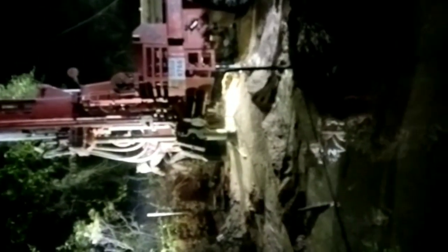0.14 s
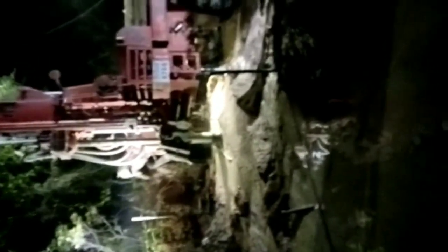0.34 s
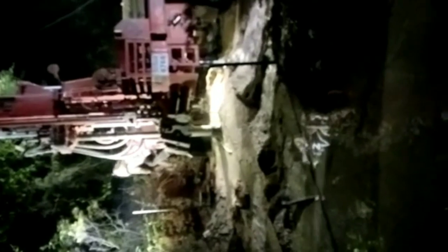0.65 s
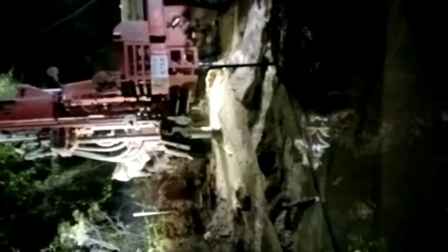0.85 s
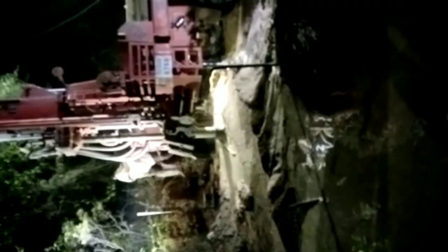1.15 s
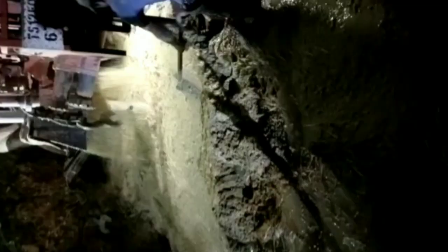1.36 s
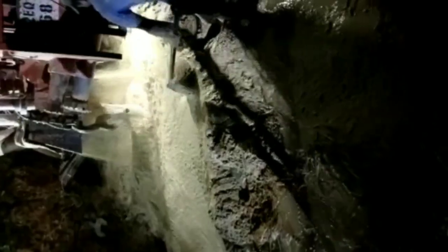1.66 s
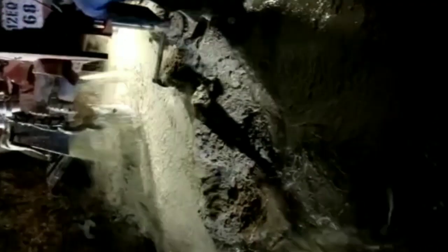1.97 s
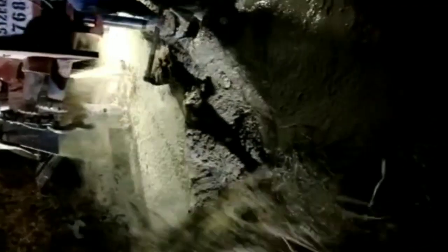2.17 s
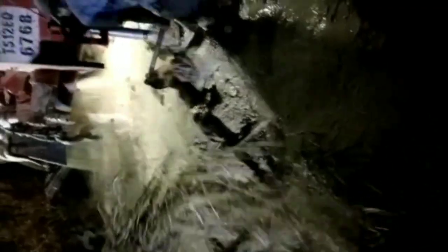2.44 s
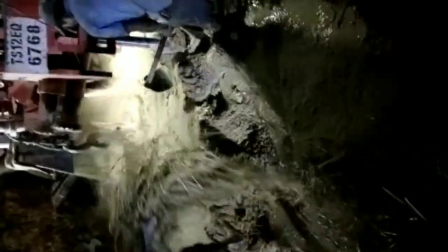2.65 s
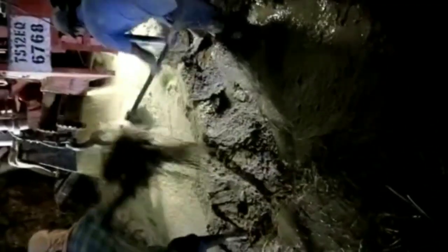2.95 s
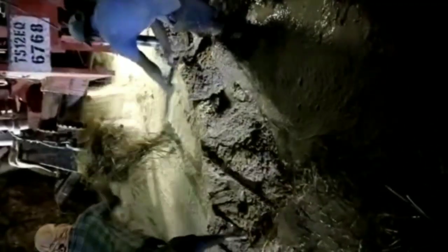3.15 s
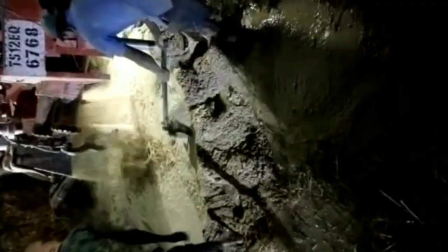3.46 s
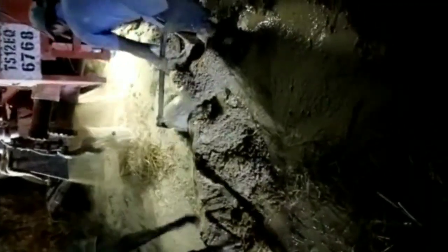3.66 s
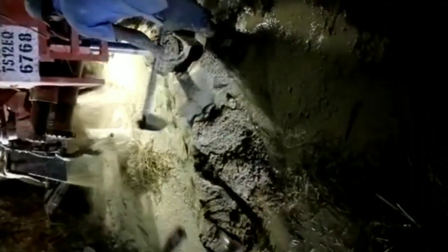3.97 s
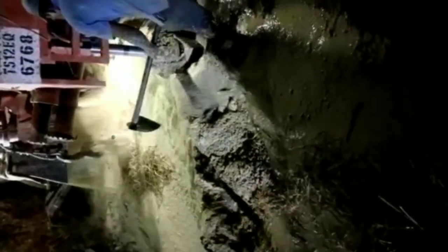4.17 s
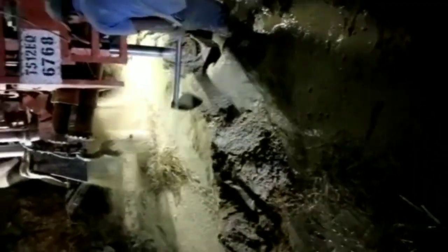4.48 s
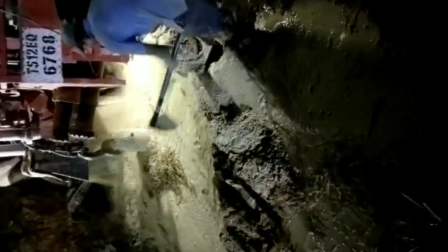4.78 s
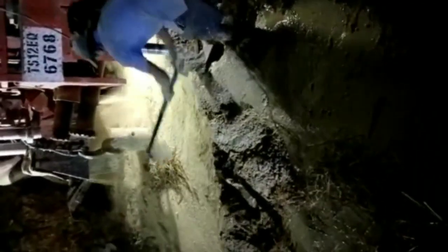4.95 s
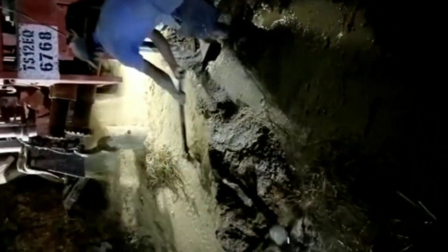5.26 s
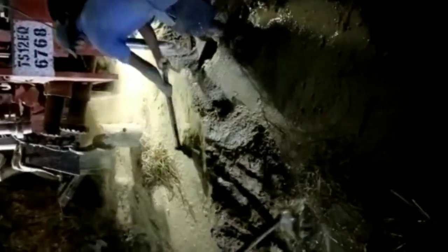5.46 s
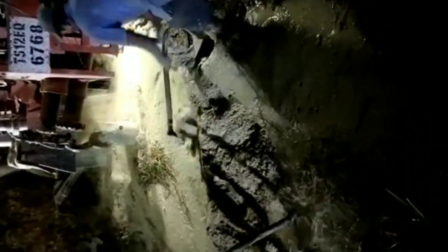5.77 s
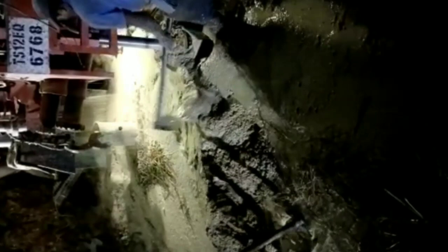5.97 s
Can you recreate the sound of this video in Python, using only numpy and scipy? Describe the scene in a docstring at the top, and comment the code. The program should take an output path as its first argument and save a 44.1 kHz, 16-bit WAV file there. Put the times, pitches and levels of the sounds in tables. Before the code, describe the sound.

Two joined views of a loud rig in the open. First, from a distance, strong bassy engine pulses with rough machinery noise and thin air hiss. A hard cut and short silence follow. Then, with the microphone beside the hole, a faster diesel drones under broad blowing air and bright spray, with loose chinking, small gritty scrapes, sharp metal-on-stone clinks and one throbbing hum that sags in pitch.

```python
"""A drilling site with a truck-mounted rig, heard from two spots with a short silence between them.
Afar, a slow diesel thumps: a harmonic series of firing orders over amplitude-modulated coloured noise.
Beside the hole a faster diesel drones, its silencer booming as tones and narrow-band noise, while
filtered noise of varying level is compressed air blowing slurry out of the bore. Loose debris rattles,
and a hoe clinks and scrapes on stones: damped modes set off by blows and by dense random clicks."""
import sys
import numpy as np
from scipy import signal
from scipy.fft import rfft, irfft
from scipy.io import wavfile

SR = 44100
rng = np.random.default_rng(int(sys.argv[2]) if len(sys.argv) > 2 else 0)


def waveform_to_disk(signal):
    """Save audio, clipped to [-1, 1], as 16-bit WAV at the path in sys.argv[1]."""
    frames = np.transpose(np.atleast_2d(signal))
    scaled = np.clip(frames, -1, 1) * 32767
    samples = np.round(scaled).astype(np.int16)
    wavfile.write(sys.argv[1], SR, samples)


N = 269892
TIME_S = np.arange(N) / SR

FAR_END_S, NEAR_START_S = 1.3165, 1.519
FAR_FIRING_HZ, NEAR_FIRING_HZ = 60.93, 95.35   # mean firing rates
FAR_LAG, NEAR_LAG = 10, -11   # delay of the left channel behind the right [samples]

# All levels hold ahead of the fade-in and the final limiter.
# Exhaust orders of six unequal cylinders: multiple of the firing rate [1], level/dB [rms, relative]
FAR_EXHAUST_ORDERS = [(.5, -27.5), (.667, -35), (1, 2), (1.33, -25), (1.5, -27), (1.67, -23), (2, -8.5),
                      (2.17, -22.5), (2.5, -25), (3.17, -31), (4.5, -40), (4.83, -31.5), (5, -31),
                      (5.83, -33), (6, -34), (6.33, -31.5), (7.33, -32.5)]
NEAR_EXHAUST_ORDERS = [(.5, -26), (.667, -28), (1, 0.5), (1.17, -29), (1.33, -27), (1.5, -19),
                       (1.67, -22.5), (1.83, -25), (2, -22.5), (2.67, -24), (3, -20.5), (3.83, -25.5),
                       (6, -39), (7.5, -30.5), (7.83, -31), (8, -24), (8.17, -28.5), (8.33, -29),
                       (8.67, -33), (10, -28.5)]
# Steady tones of pumps and fans: f/Hz, level/dB [rms]
PUMP_TONES = [(58.7, -32.5), (332, -31), (393, -31.5), (815, -41.5)]
# Noise spectra, silent outside their end points: f/Hz, level/dB [relative, per Hz]
FAR_MACHINERY_SPECTRUM = [(22, -10.5), (45, -6.5), (85, -9.5), (130, -6), (175, -10), (260, -7),
                          (310, -2.5), (450, -8), (540, -13), (660, -14.5), (780, -7), (1050, -16),
                          (1500, -15), (1700, -19.5), (2600, -23.5)]
FAR_AIR_SPECTRUM = [(2200, -29), (2950, -15.5), (3200, -6), (3660, -5), (4500, -12.5), (5200, -19.5),
                    (5850, -21), (8300, -22), (9100, -12.5), (9800, -23), (10700, -29.5), (16000, -33)]
NEAR_MACHINERY_SPECTRUM = [(22, -15), (60, -4.5), (150, -1), (195, 1), (225, -5), (330, -4), (400, -2),
                           (440, -11.5), (620, -13), (760, -8), (825, -5), (880, -14.5), (1100, -14),
                           (1350, -14.5), (1600, -22), (2000, -30)]
BOOM_SPECTRUM = [(300, -20), (350, -1), (380, -1.5), (400, 5.5), (430, -29)]
AIR_SPECTRUM = [(1000, -13), (1330, -9), (1600, -2), (2200, -2.5), (2900, -3), (3130, -0.5), (3950, -5),
                (4370, -5), (4870, -6.5), (5800, -12.5)]
SPRAY_SPECTRUM = [(5300, -1.5), (6330, 1), (7150, 1.5), (8540, 3), (9610, 3), (10200, -2.5), (13000, -6),
                  (14900, 0), (16000, -20)]
# Resonances of panels and pipes in the noise: f/Hz, width/Hz, boost/dB
FAR_PANEL_MODES = [(383, 9.4, 5), (454, 9.5, 4.5), (1152, 29, 9), (1520, 23, 9), (1836, 81, 5),
                   (2797, 180, 12), (3180, 110, 5.5), (3610, 220, 4.5), (3870, 40, 4.5), (4290, 70, 4),
                   (5070, 280, 8)]
NEAR_PANEL_MODES = [(1200, 79, 2.7), (1900, 57, 1.8), (2730, 18, 7.6), (3080, 19, 4.1), (4300, 77, 3.4),
                    (4500, 42, 3.5), (6920, 48, 9.6), (9240, 230, 1.5)]
# Stereo coherence: f/Hz, share of power common to both channels [1, clipped to 0 ... 0.995]
FAR_COHERENCE = [(60, 1), (130, 0.5), (290, 0.8), (640, 1.3), (1400, -0.3), (3100, 0.68), (6800, 0.27),
                 (15000, -0.1)]
NEAR_COHERENCE = [(60, 0.8), (130, 0.99), (290, 0.87), (640, 0.091), (1400, 0.08), (3100, 0.17),
                  (6800, 0.16), (15000, 0.3)]
# Stereo balance of the noise: f/Hz, left minus right level/dB
STEREO_BALANCE = [(1000, 0), (2400, 1.5), (4400, 2), (8100, 3), (10500, 4), (15000, .5)]
# Air blowing out of the bore: t/s, air level/dB [rms], spray level/dB [rms]
BLOW_LEVELS = [(1.5, -23.5, -26.5), (1.9, -26, -28.5), (2.1, -26.5, -29), (2.7, -26.5, -30),
               (3.0, -25.5, -28), (3.75, -26, -28.5), (3.83, -24.5, -31.5), (3.87, -25, -24),
               (3.91, -25.5, -30.5), (4.28, -26.5, -29), (4.4, -28, -33.5), (4.6, -27, -29),
               (4.9, -28, -34), (5.1, -28, -33), (5.26, -30, -34.5), (5.29, -26, -26), (5.34, -28.5, -36),
               (5.5, -30, -33.5), (5.78, -30, -35.5), (6.12, -28.5, -33)]
# Silencer boom: t/s, level/dB [rms]
BOOM_LEVELS = [(1.5, -27), (1.8, -26), (2.2, -32), (3.1, -30), (4.9, -32.5), (5.2, -34), (5.6, -30),
               (5.8, -33), (6.12, -29)]
# Hum at twice the firing rate: t/s, level/dB [rms]
SECOND_ORDER_LEVELS = [(1.5, -31.5), (2.5, -38), (2.75, -27), (3.2, -34), (3.45, -27.5), (3.8, -28),
                       (4.1, -34.5), (4.9, -41), (5.05, -21), (5.45, -35), (5.7, -33), (6.12, -38)]
# Low thump near the start of the near spot: t/s, f/Hz, peak level/dB, T60/s
LOW_THUMP = (1.744, 38, -11, .1)
# Modes of the hoe: f/Hz, level/dB [relative], free T60/s
BLADE_MODES = [(710, -6, .07), (800, -4, .12), (1150, -3, .08), (1310, 0, .11), (1450, -4, .1),
               (1740, -1, .08), (1960, -2, .09), (2540, -2, .2), (3125, 0, .12), (3290, -7, .1),
               (3750, -5, .07), (3900, 0, .07), (4270, -2, .09), (4550, -4, .12), (5300, 0, .08)]
# Blows on stones; the point struck favours one pitch, mud on the blade alters the ring:
# t/s, peak level/dB [ahead of the mode levels], favoured f/Hz, fraction of the free T60 [1]
STONE_BLOWS = [(1.91, -20, 1960, .9), (1.928, -15, 2540, .7), (1.93, -17, 3290, .9), (1.945, -17, 4600, 1.),
               (1.965, -16, 4570, .5), (1.975, -17, 3750, .4), (2.158, -17, 4270, .7),
               (2.178, -16, 1310, 1.3), (2.21, -17, 2540, .3), (2.235, -11, 3290, .7),
               (2.25, -18, 4270, .6), (2.27, -17, 4270, .6), (2.295, -14, 3290, .5), (2.352, -16, 4100, .5),
               (2.392, -8, 4270, .4), (2.40, -17, 1310, .6), (3.296, -3, 4000, .3), (3.297, -13, 5300, .3),
               (3.425, -16, 3200, .3), (3.562, -16, 4270, .9), (3.578, -18, 4500, .5),
               (3.58, -18, 1350, .7), (3.682, -16, 4230, .9), (3.756, -17, 1960, .8),
               (4.898, -11, 3900, .5), (4.903, -14, 3600, .5), (4.836, -15, 1240, .8),
               (4.901, -4, 1220, .7), (4.906, -11, 1740, .8), (4.912, -8, 760, .9), (4.92, -13, 3125, .9),
               (4.935, -16, 2540, .3), (4.945, -13, 3125, .8), (4.965, -16, 1300, .6),
               (4.983, -14, 2600, .4), (4.983, -16, 3125, .7), (4.9958, -17, 3125, .9)]
# Blade dragged over grit: t/s, length/s, peak level/dB [of the rms], favoured f/Hz
GRIT_DRAGS = [(1.772, 0.05, -28, 1900), (1.892, 0.11, -24, 2600), (2.16, 0.075, -25.5, 2600),
              (2.284, 0.041, -30, 3200), (2.345, 0.06, -29, 4000), (3.29, 0.027, -30, 4500),
              (3.45, 0.06, -31, 3500), (4.775, 0.06, -25, 3300), (4.825, 0.05, -25, 1800),
              (4.895, 0.05, -20.5, 1500), (4.925, 0.08, -24.5, 1500)]


def from_db(db):
    """Definition of level: amplitude ratio = 10^(dB/20)."""
    return 10 ** (np.asarray(db) / 20)


def rms_one(x):
    """Normalisation to unit mean power."""
    return x / np.sqrt(np.mean(x ** 2) + 1e-20)


def in_time(rows):
    """Linear interpolation of each table column to one value a sample."""
    s, *columns = np.transpose(rows)
    return [np.interp(TIME_S, s, column) for column in columns]


def at_hz(points, hz):
    """Interpolation of a spectrum on a logarithmic frequency axis."""
    table_hz, values = np.transpose(points)
    return np.interp(np.log(hz), np.log(table_hz), values)


def drift(rate):
    """Low-pass random process: white noise on a coarse grid through two equal poles at rate [Hz]."""
    step = 40   # samples
    r = np.exp(-2 * np.pi * rate * step / SR)
    white = rng.standard_normal(N // step + 2002)
    slow = signal.lfilter([1], [1, -2 * r, r * r], white)[2000:]   # without the settling time
    return np.interp(np.arange(N) / step, np.arange(len(slow)), rms_one(slow))


def both_channels(x, lag):
    """Interchannel delay: the left channel carries the same wave lag samples later."""
    return np.array([x[np.clip(np.arange(N) - lag, 0, N - 1)], x])


def fade_in(length_s):
    """Linear amplitude ramp from -15 dB to full level."""
    along = np.clip((TIME_S - NEAR_START_S) / length_s, 0, 1)
    return along + (1 - along) * from_db(-15)


def ring_out(clicks, hz, width):
    """Impulse response of a two-pole resonator: clicks ring at hz with bandwidth width [Hz]."""
    r = np.exp(-np.pi * width / SR)
    poles = [1, -2 * r * np.cos(2 * np.pi * hz / SR), r * r]
    return rms_one(signal.lfilter([1, 0, -1], poles, clicks + 1e-18))


def struck(s, hz, peak_db, t60, crack_db):
    """Modal impact: a soft contact starts decaying sinusoids and a short low-passed noise crack."""
    out, t = np.zeros(N), np.arange(SR // 4)[:, None] / SR
    rings = from_db(peak_db - 60 * t / t60) * np.sin(2 * np.pi * hz * t)
    low_pass = signal.butter(4, 5000, fs=SR, output="sos")
    crack = signal.sosfilt(low_pass, rng.standard_normal(len(t)))
    crack *= from_db(np.max(peak_db) + crack_db - 60 * t[:, 0] / 0.02)
    onset = 1 - np.exp(-t[:, 0] / 0.004)
    out[round(s * SR):][:len(t)] = onset * rings.sum(axis=1) + crack
    return out


def noise(spectrum, panels, likeness, lag, shared_db, own_db, rate, size):
    """Spectral shaping of partly coherent stereo noise; third-octave bands fluctuate; mid power 1."""
    hz = np.maximum(np.arange(size // 2 + 1) * SR / size, 1)
    alike = np.clip(at_hz(likeness, hz), 0, .995)
    common, *apart = rfft(rng.standard_normal((3, size)))
    half = np.array([[.5], [-.5]])   # left, right
    turn = np.exp(-2j * np.pi * half * hz * lag / SR)   # phase of the interchannel delay
    inside = (hz > spectrum[0][0]) & (hz < spectrum[-1][0])
    boost_db = sum(db / (1 + (2 * (hz - centre) / width) ** 2) for centre, width, db in panels)
    colour = from_db(at_hz(spectrum, hz) + boost_db + half * at_hz(STEREO_BALANCE, hz)) * inside
    whole = colour * (np.sqrt(alike) * common * turn + np.sqrt(1 - alike) * np.array(apart))
    place = np.log2(hz / spectrum[0][0]) * 3   # third octaves above the lower edge
    out, together = 0, drift(rate)[:size]
    for k in range(int(place[inside].max()) + 2):
        band = np.clip(1 - abs(place - k), 0, 1)   # overlapping bands that sum to one
        swing_db = shared_db * together + own_db * drift(rate)[:size]
        out = out + from_db(swing_db) * irfft(whole * band, size)
    return out / np.sqrt(np.mean(out.mean(axis=0) ** 2))


def diesel(firing_hz, orders, wander, unsteady_db):
    """Fourier synthesis of exhaust pulses from orders of a wandering firing rate; also the phase."""
    phase = np.pi + 2 * np.pi * np.cumsum(firing_hz * (1 + wander * drift(2.1))) / SR
    out = 0
    for k, db in orders:
        multiple = round(6 * k) / 6
        # whole orders align into one sharp suction pulse a firing; the rest come from unequal cylinders
        start = np.pi if multiple % 1 == 0 else rng.uniform(0, 2 * np.pi)
        swing = unsteady_db * np.clip(-db / 4, 1, 5) * drift(5.0)   # weak orders waver more
        out = out + from_db(db + swing) * np.cos(multiple * phase + start)
    return np.sqrt(2) * out, phase


def far_spot():
    """Amplitude modulation: each firing of the slow diesel modulates the machinery and air noise."""
    size = 60000
    exhaust, phase = diesel(FAR_FIRING_HZ, FAR_EXHAUST_ORDERS, wander=.001, unsteady_db=.3)
    picture = FAR_PANEL_MODES, FAR_COHERENCE, FAR_LAG
    machinery = noise(FAR_MACHINERY_SPECTRUM, *picture, shared_db=-1.5, own_db=1.5, rate=15.0, size=size)
    air = noise(FAR_AIR_SPECTRUM, *picture, shared_db=.7, own_db=1.6, rate=20., size=size)
    throb = 1 + 0.17 * np.cos(phase[:size]) + 0.16 * np.cos(phase[:size] / 2)
    hiss = throb * (from_db(-26) * machinery + from_db(-30.5) * air)
    return from_db(-9) * both_channels(exhaust, FAR_LAG) + np.pad(hiss, ((0, 0), (0, N - size)))


def rattle():
    """Sparse random excitation of many small resonators: loose metal and debris chink on both sides."""
    chinks_per_s = 130
    sizes = from_db(2.3 * np.minimum(rng.exponential(1, N), 4)) * (rng.random(N) < chinks_per_s / SR)
    dealt, out = rng.integers(0, 24, N), np.zeros((2, N))   # each chink goes to one resonance
    for k, hz in enumerate(np.geomspace(900, 5200, 24)):
        pan = from_db(rng.normal(0, 7) * np.array([[.5], [-.5]]))
        out += ring_out(sizes * (dealt == k), hz, width=40) * pan
    return rms_one(out)


def near_noise(boom_db):
    """Turbulence noise of air and spray from the bore, over rumble, silencer boom and rattle."""
    size = 204800
    air_db, spray_db = in_time(BLOW_LEVELS)
    picture = NEAR_PANEL_MODES, NEAR_COHERENCE, NEAR_LAG
    machinery = noise(NEAR_MACHINERY_SPECTRUM, *picture, shared_db=1.0, own_db=1.5, rate=16.7, size=size)
    boom = noise(BOOM_SPECTRUM, *picture, shared_db=0.5, own_db=1.5, rate=2.6, size=size)
    air = noise(AIR_SPECTRUM, *picture, shared_db=.5, own_db=1.2, rate=24., size=size)
    spray = noise(SPRAY_SPECTRUM, *picture, shared_db=1.1, own_db=1.6, rate=24., size=size)
    hiss = from_db(-19.5) * machinery + from_db(boom_db[-size:]) * boom
    hiss += from_db(air_db[-size:]) * air + from_db(spray_db[-size:]) * spray
    rattle_db = -31 + air_db - air_db.max()   # the rattle follows the air
    return np.pad(hiss, ((0, 0), (N - size, 0))) + from_db(rattle_db) * rattle()


def pump_tones():
    """Superposition of sinusoids at fixed frequencies with slowly drifting levels."""
    return sum(from_db(db + 1.4 * drift(0.77)) * np.sqrt(2) * np.sin(2 * np.pi * hz * TIME_S)
               for hz, db in PUMP_TONES)


def swell():
    """Frequency and amplitude modulation: the silencer boom swells once, throbbing and sagging."""
    centre_s, rise_s, fall_s, throb_top_s = 5.23, 0.11, 0.33, 5.255
    t = TIME_S - centre_s
    shape = np.where(t < 0, np.exp(-(t / rise_s) ** 2), np.exp(-abs(t) / fall_s))
    throb = 1 + .4 * np.cos(2 * np.pi * 12.3 * (TIME_S - throb_top_s))   # 12.3 Hz
    hz = 381 - 30 * t + 2 * drift(8.)   # sags by 30 Hz a second
    tone = np.sqrt(2) * np.sin(2 * np.pi * np.cumsum(hz) / SR)
    return from_db(-16 + drift(5.)) * shape * throb * tone


def near_engine(boom_db):
    """Phase-locked harmonics: exhaust, second-order and fourth-order hum, with tones and the swell."""
    exhaust, phase = diesel(NEAR_FIRING_HZ, NEAR_EXHAUST_ORDERS, wander=.0035, unsteady_db=.4)
    # the silencer rings at the fourth order
    hum = from_db(boom_db - 2 + 1.8 * drift(6.4)) * np.sqrt(2) * np.sin(4 * phase)
    second = from_db(in_time(SECOND_ORDER_LEVELS)[0]) * np.sqrt(2) * np.cos(2 * phase)
    steady = hum + second + pump_tones() - from_db(-10.5) * exhaust   # exhaust polarity inverted
    return both_channels(fade_in(0.48) * steady + swell(), NEAR_LAG)


def clinks():
    """Modal excitation: a blow rings every mode of the hoe, favouring those near one pitch."""
    hz, mode_db, t60 = np.transpose(BLADE_MODES)
    out = 0
    for s, db, favoured_hz, free in STONE_BLOWS:
        peak_db = db + mode_db - 55 * abs(np.log2(hz / favoured_hz))   # falls 55 dB an octave
        out = out + struck(s, hz, peak_db, free * t60, crack_db=-11)
    return out


def scrapes():
    """Friction as dense impulsive excitation: uneven clicks ring in the damped modes of the blade."""
    clicks = rng.standard_normal(N) * from_db(3 * np.minimum(rng.exponential(1, N), 3.5))
    clicks *= rng.random(N) < 5000 / SR   # about 5000 a second
    hz, mode_db, _ = np.transpose(BLADE_MODES)
    # the ground damps the modes, widening each resonance to 170 Hz
    rings = np.array([ring_out(clicks, mode_hz, width=170) for mode_hz in hz])
    out = np.zeros(N)
    for s, length, db, favoured_hz in GRIT_DRAGS:
        span = slice(round(s * SR), round((s + length) * SR))
        share = from_db(mode_db - 8 * abs(np.log2(hz / favoured_hz)))   # falls 8 dB an octave
        along = np.clip((TIME_S[span] - s) / length, 0, 1)
        stroke = np.sin(np.pi * np.sqrt(along))   # quick bite, slower release
        out[span] += from_db(db) * stroke * (share / np.linalg.norm(share) @ rings[:, span])
    return out


def hoe():
    """Intensity panning: clinks and scrapes share one place slightly to the left."""
    return (clinks() + scrapes()) * from_db([[1.1], [-1.1]])


def near_spot():
    """Linear superposition of noise, engine, thump and hoe; noise and engine fade in, the noise faster."""
    boom_db, = in_time(BOOM_LEVELS)
    background = fade_in(0.22) * near_noise(boom_db)
    return background + near_engine(boom_db) + struck(*LOW_THUMP, crack_db=-40) + hoe()


def scene():
    """Time gating: the far spot stops dead; after the silence the near spot opens."""
    closing = np.clip((FAR_END_S - TIME_S) / 0.0016, 0, 1)
    opening = np.clip((TIME_S - NEAR_START_S) / 0.003, 0, 1)
    return closing * far_spot() + opening * near_spot()


def record(dry):
    """Saturation and band limitation: peaks are rounded and clipped, then a steep low-pass follows."""
    rounded = np.clip(1.695 * np.tanh(dry / 1.547), -.97, .97)
    low_pass = signal.ellip(12, .5, 75, 15620, fs=SR, output="sos")   # cutoff in Hz
    return np.clip(signal.sosfilt(low_pass, rounded), -1, 1)


dry = scene()
out = record(dry)
waveform_to_disk(out)
```